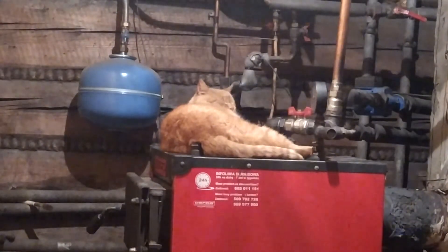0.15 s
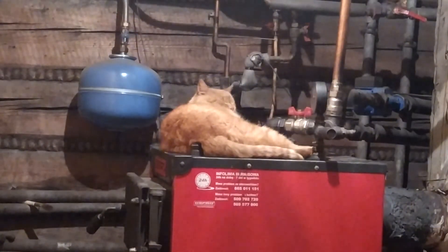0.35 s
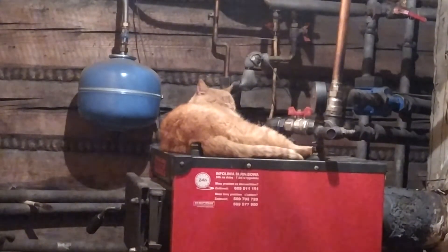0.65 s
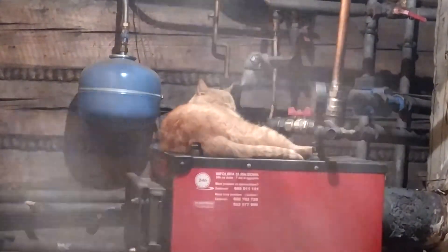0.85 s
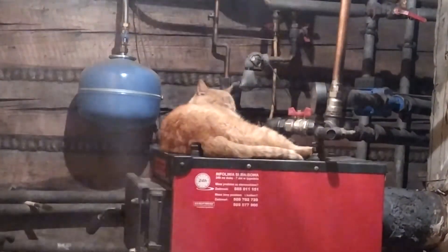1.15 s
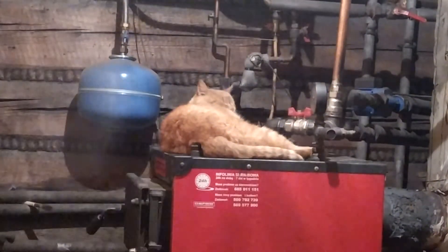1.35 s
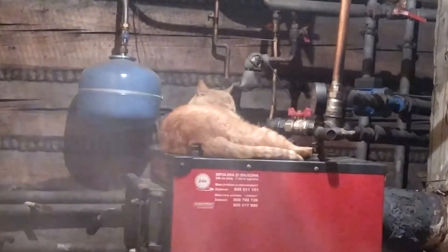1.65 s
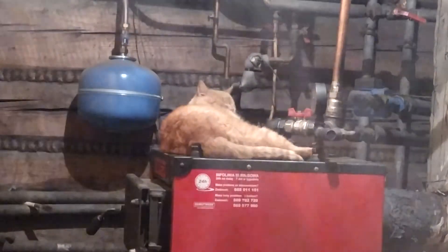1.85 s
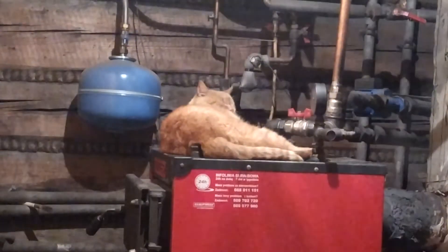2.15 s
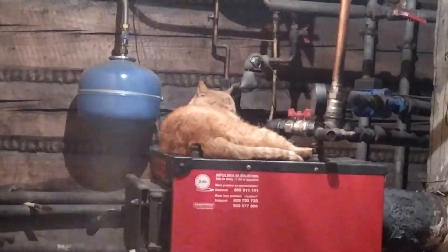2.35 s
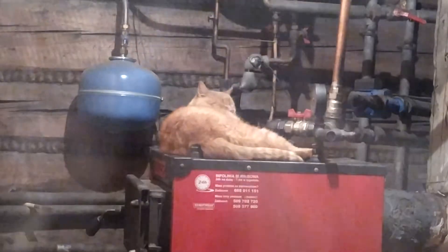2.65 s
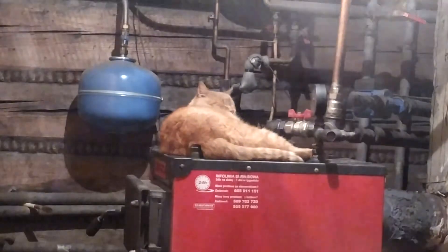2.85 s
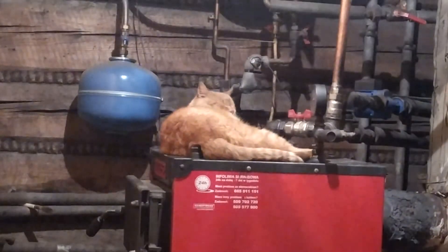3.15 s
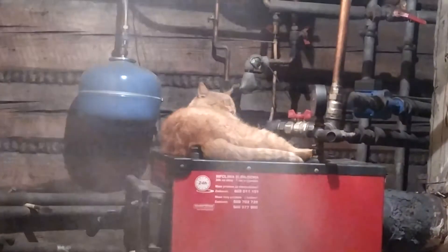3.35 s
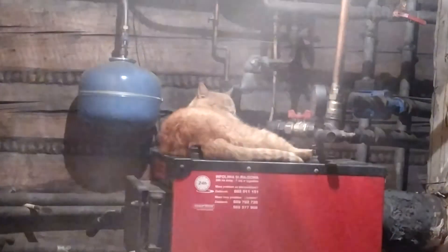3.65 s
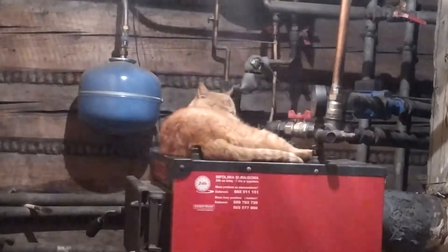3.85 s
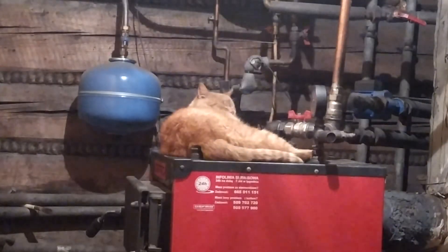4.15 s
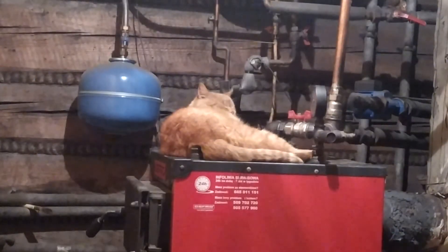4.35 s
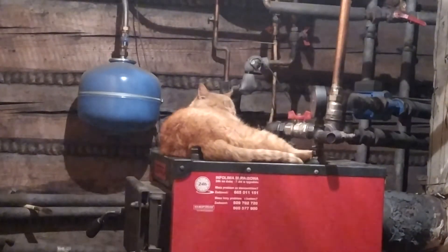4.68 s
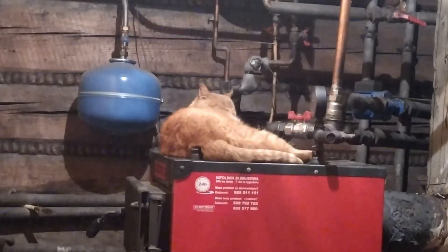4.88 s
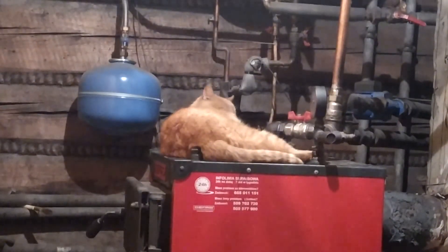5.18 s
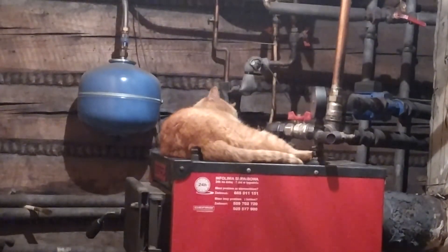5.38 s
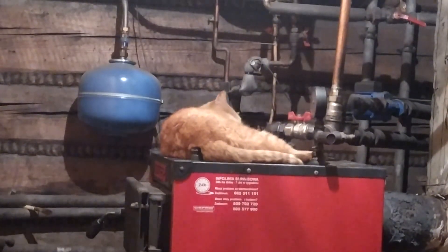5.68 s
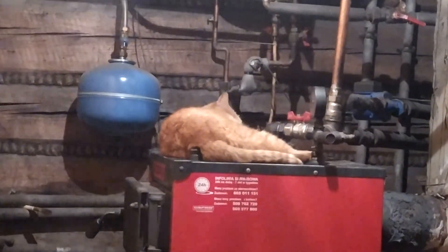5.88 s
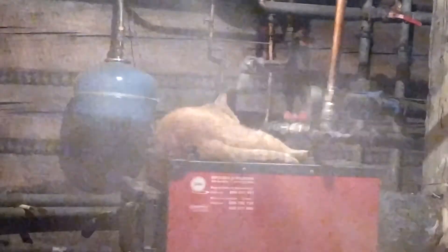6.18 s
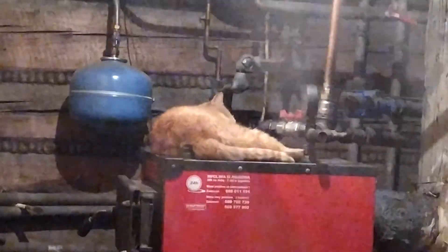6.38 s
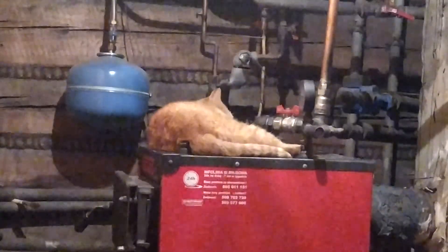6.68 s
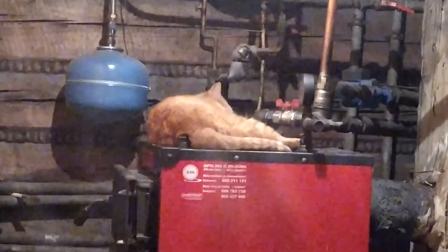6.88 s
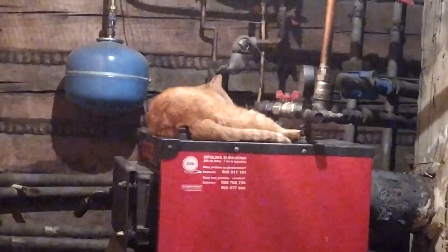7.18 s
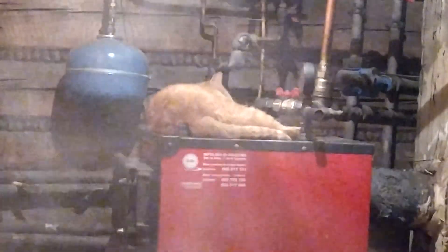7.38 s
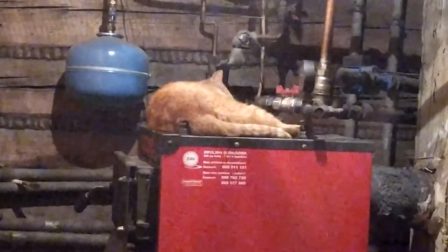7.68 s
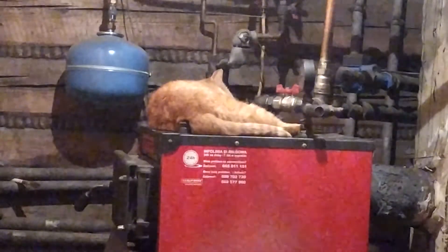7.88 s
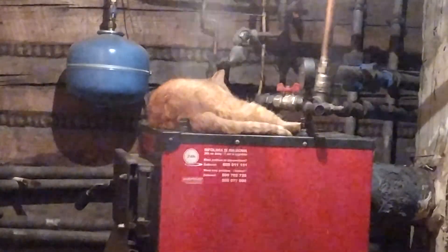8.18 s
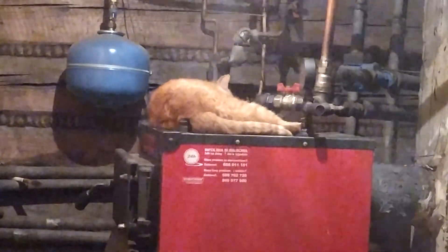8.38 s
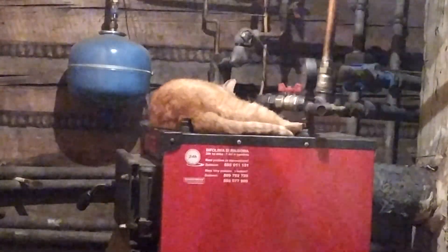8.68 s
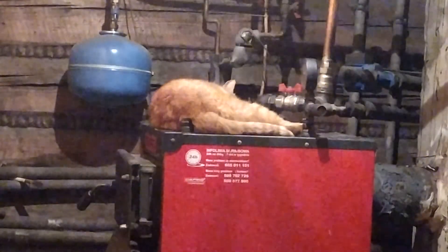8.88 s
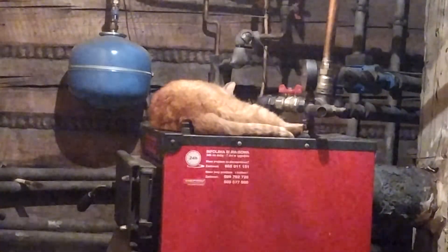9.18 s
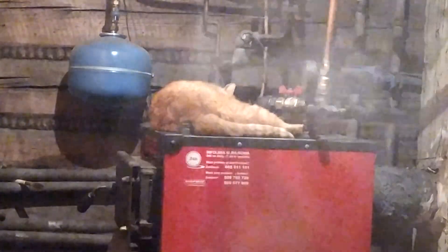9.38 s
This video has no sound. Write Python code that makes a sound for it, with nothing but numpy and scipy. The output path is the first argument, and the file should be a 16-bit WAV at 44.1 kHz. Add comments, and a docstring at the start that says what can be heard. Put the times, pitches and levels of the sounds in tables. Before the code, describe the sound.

Close up and a little to the right, popcorn cooks in a covered pan. A bright hiss of frying oil runs throughout, dotted with small kernels ticking on metal. Kernels crack open singly or in quick clusters, thumping the pan and knocking against its lid, sparsely at first and then more busily. A small room adds a short echo and a faint rumble underneath.

```python
"""Popcorn bursts in a lidded pan of hot oil, close to the right of a pair of microphones.
Each burst cracks the hull, thumps the pan's air and base, and sends puffed corn tumbling.
Oil sizzles and spits throughout, and small kernels tick on the metal.
A small hard room echoes the blows over a faint rumble."""
import sys
import numpy as np
from scipy import signal
from scipy.fft import rfft, irfft, next_fast_len
from scipy.io import wavfile
from scipy.ndimage import uniform_filter1d

SR = 44100
rng = np.random.default_rng(int(sys.argv[2]) if len(sys.argv) > 2 else 0)


def transcribe(signal):
    """Save signal, clipped to [-1, 1], as a 16-bit WAV file at the path in sys.argv[1]."""
    frames = np.atleast_2d(signal).T
    limited = np.clip(frames, -1, 1)
    pcm = np.round(limited * 32767).astype(np.int16)
    wavfile.write(sys.argv[1], SR, pcm)


N = 420273
LEFT_LAG_SAMPLES, LEFT_DB = 15, -0.5  # the pan is later and quieter on the left


def amp(db):
    """Turn decibels into a gain."""
    return 10 ** (np.asarray(db) / 20)


def level(x, db):
    """Set the average (RMS) level of x."""
    return x * amp(db) / np.sqrt(np.mean(x ** 2))


def band(x, lo_hz, hi_hz):
    """Keep what lies between two pitches."""
    edges_hz = [lo_hz, min(hi_hz, .45 * SR)]
    return signal.sosfilt(signal.butter(2, edges_hz, "band", fs=SR, output="sos"), x)


def fade(fade_s, length_s=.05):
    """Die away by 60 dB in fade_s seconds."""
    return np.exp(-np.log(1000) * np.arange(int(length_s * SR)) / SR / fade_s)


def sines(hz, fade_s, length_s):
    """One fading tone per row."""
    t = np.arange(int(length_s * SR)) / SR
    return np.sin(2 * np.pi * hz[:, None] * t) * np.exp(-np.log(1000) * t / fade_s[:, None])


def ring(blows, tones):
    """Each row of blows sets one fading tone ringing."""
    out = 0
    for row, (hz, db, fade_s) in zip(blows, tones):
        decay = np.exp(-np.log(1000) / (fade_s * SR))
        turn = 2 * np.pi * hz / SR
        feedback = [1, -2 * decay * np.cos(turn), decay * decay]
        out = out + amp(db) * signal.lfilter([0, decay * np.sin(turn)], feedback, row)
    return out


def strike(clicks, tones):
    """Each click lands somewhere new, so it rings its own mix of tones on three paths."""
    at = np.flatnonzero(clicks)
    blows = np.zeros((len(tones), 3, N))
    blows[..., at] = clicks[at] * rng.uniform(-1.126, 1, (len(at), 3, len(tones))).T
    return ring(blows, tones)


def coloured(x, curve):
    """Turn each pitch up or down along a curve."""
    hz, db = np.transpose(curve)
    size = next_fast_len(N)
    bins_hz = np.maximum(np.arange(size // 2 + 1) * SR / size, 1)
    gain = amp(np.interp(np.log(bins_hz), np.log(hz), db))
    return irfft(rfft(x, size) * gain, size)[..., :N]


def wander(per_s):
    """Glide from one random value to the next."""
    step = int(SR / per_s)
    held = np.repeat(rng.standard_normal(N // step + 1), step)
    return 0.62 * uniform_filter1d(held, step)[:N]


def grains(per_s, spread_db):
    """Random clicks, most small and a few large."""
    size = np.minimum(rng.exponential(size=N), 3.5)
    return (rng.random(N) < per_s / SR) * amp(spread_db * size)


def add(out, start_s, x):
    """Mix x into out at the given time."""
    i = int(start_s * SR)
    out[..., i:i + x.shape[-1]] += x[..., :N - i]


def pair(paths, share):
    """Three paths become stereo: row 0 reaches both sides, rows 1 and 2 one side each."""
    both = np.array([np.roll(paths[0], LEFT_LAG_SAMPLES), paths[0]])
    return np.sqrt(share) * both + np.sqrt(1 - share) * paths[1:]


# The tone of the room's rumble: pitch_hz, gain_db
RUMBLE_CURVE = [(18, -36), (30, 10), (59, -1.5), (76, -10.5), (160, -6.5), (217, -33), (296, -16),
                (333, -25), (735, -11.5), (929, -45), (1000, -12.5), (1300, -71), (2200, -120)]


def rumble():
    """Low room noise, mostly alike on both sides."""
    middle, side = (level(coloured(rng.standard_normal(N), RUMBLE_CURVE), -56.5) for _ in range(2))
    return middle + 0.26 * side * np.array([[1], [-1]])


def room(x, echo_db=-14):
    """Hard walls give each side its own scatter of echoes, thin in the bass."""
    echoes = rng.standard_normal((2, int(.15 * SR))) * fade(0.16, length_s=.15)
    echoes = band(echoes, lo_hz=320, hi_hz=4900)
    echoes *= amp(echo_db) / np.sqrt((echoes ** 2).sum(axis=1, keepdims=True))
    return x + signal.fftconvolve(x, echoes, axes=1)[:, :N]


def spits():
    """A gain that jumps whenever a lone large bubble bursts."""
    decay = fade(0.013)[1]
    bursts = signal.lfilter([1], [1, -decay], grains(per_s=55, spread_db=3.7))
    return 1.5 + level(bursts, -7.5)


# How loud the frying is as time passes: time_s, sizzle_db, tick_db, fizz_db
FRYING_LEVELS = [(0.0, -34.5, -44.5, -42.5), (0.4, -36, -47, -49), (0.7, -36.5, -44.5, -49),
                 (1.15, -38, -52, -53.5), (1.9, -39.5, -52, -52), (3.15, -40.5, -53, -53.5),
                 (3.2, -38.5, -66, -51), (3.4, -39.5, -50.5, -51), (4.601, -38.5, -52, -52),
                 (5.05, -40, -50, -49.5), (5.55, -38.5, -51, -47.5), (5.92, -34.5, -44, -40.5),
                 (6.26, -36.5, -45, -45.5), (7.248, -37, -43, -45.5), (8.15, -38.5, -43.5, -49),
                 (8.68, -39, -46, -51), (9.158, -35.5, -42, -46), (9.53, -38, -46.5, -49)]
# The tone of the sizzling oil: pitch_hz, gain_db
SIZZLE_CURVE = [(530, -56), (900, -12), (1040, -10.5), (1700, -2), (1970, -1), (2460, -2.5), (2760, -2),
                (3160, 4), (3600, 2), (3870, 1), (4400, 4.5), (5400, 4), (6300, 8), (7400, 7), (8600, 5.5),
                (11000, 10.5), (14300, -3), (22000, -120)]
# Tones a hard kernel rings in the metal: pitch_hz, level_db, fade_s
TICK_TONES = [(1310, -4, 0.037), (1510, 2, 0.025), (1687, 4, 0.048), (1793, 3, 0.033), (2130, 1.5, 0.025),
              (2306, -1.5, 0.077), (2441, 2.5, 0.057), (3110, 1.5, 0.042), (3380, 2, 0.026),
              (4450, 5.5, 0.0061), (6270, 5.5, 0.014)]


def frying():
    """Steam bubbles burst in flurries, each size at its own pace; loose kernels tick on the metal."""
    time_s, *columns = np.transpose(FRYING_LEVELS)
    sizzle_db, tick_db, fizz_db = (np.interp(np.arange(N) / SR, time_s, c) for c in columns)
    bursts = signal.fftconvolve(grains(per_s=300, spread_db=3.5), fade(0.05, length_s=0.02))[:N]
    flurry = (level(bursts, 0) + 3) * amp(1.4 * wander(25))
    edges_hz = 850 * 2 ** np.arange(0, 4, .5)  # one band for each bubble size
    oil = 0
    for lo_hz, hi_hz in zip(edges_hz, edges_hz[1:]):
        bubbles = band(rng.standard_normal((3, N)), lo_hz, hi_hz) * spits()
        flicker = 3.6 * wander(60) + 1.4 * wander(14)
        oil = oil + bubbles * amp(flicker * (2500 / lo_hz) ** 0.59)  # finer bubbles hiss more steadily
    sizzle = level(coloured(oil * flurry, SIZZLE_CURVE), sizzle_db)
    hiss = band(rng.standard_normal((3, N)), lo_hz=9500, hi_hz=15500)
    fizz = level(hiss * flurry * spits() * amp(1.7 * wander(40)), fizz_db)
    ticks = level(strike(grains(per_s=130, spread_db=3.1), TICK_TONES), tick_db)
    return pair(sizzle + fizz, share=0.019) + pair(ticks, share=0.44)


# Tones of the pan's walls and lid: pitch_hz, level_db, fade_s
WALL_TONES = [(366, 6.5, 0.013), (474, -0.5, 0.048), (549, -3.5, 0.08), (603, 0, 0.075), (690, -1.5, 0.06),
              (732, -1, 0.071), (800, -1.5, 0.067), (1014, 1, 0.05), (1045, 4, 0.033), (1146, 1, 0.046),
              (1406, 9, 0.026)]
# Puffed corn dropping onto the pan: start_s, level_db, pitch_hz
BOUNCES = [(0.116, -47, 724), (0.367, -47.5, 597), (0.675, -44, 536), (1.409, -53, 707), (1.601, -45, 721),
           (1.625, -36.5, 534), (1.636, -39, 544), (2.246, -37, 476), (2.295, -41.5, 745),
           (2.484, -46, 694), (2.535, -54, 616), (2.916, -40, 1190), (3.297, -42, 460), (3.428, -45, 1120),
           (3.502, -29, 440), (4.169, -46, 1200), (4.44, -49, 730), (4.896, -49, 730), (5.589, -39, 696),
           (5.64, -44, 950), (5.707, -47, 960), (5.87, -48, 741.5), (7.123, -37, 750), (7.137, -43, 749),
           (7.167, -46, 540), (7.229, -33, 1060), (7.427, -47, 744), (7.812, -40, 603), (8.057, -45, 740),
           (8.86, -41.5, 1140), (9.328, -45, 450)]


def bounces(reach_octaves=0.54):
    """A soft landing rings only the wall tones near its own pitch: a hollow knock."""
    out = np.zeros((3, N))
    hz, tone_db, fade_s = np.transpose(WALL_TONES)
    tones = sines(hz, fade_s, length_s=.12)
    for start_s, level_db, pitch_hz in BOUNCES:
        nearness = np.exp(-(np.log2(hz / pitch_hz) / reach_octaves) ** 2)
        mix = amp(level_db + tone_db) * nearness * rng.choice([-1, 1], (3, len(hz)))
        add(out, start_s, mix @ tones)
    return pair(out, share=0.79)


def crack(peak_db, hz, rise_s, fade_s, width, hiss_db, rattle=0.13, split=0):
    """Noise around one pitch plus a wide hiss; split sharpens the start, rattle adds a tail."""
    noise = rng.standard_normal((2, 3, int(.05 * SR)))
    pitched = level(band(noise[0], hz / width, hz * width), 0)
    hiss = level(band(noise[1], 970, 11200), hiss_db)
    fall = fade(fade_s) + split * fade(0.012) + rattle * fade(0.32)
    burst = (pitched + hiss) * fall * (1 - fade(rise_s))
    return burst * amp(peak_db) / np.abs(burst).max(axis=1, keepdims=True)


# Corn and hulls hitting the metal: start_s, crack_db, pitch_hz, knock_db
TAPS = [(0.013, -23.5, 1490, -50), (0.2448, -35, 4410, -70), (0.3158, -27, 1810, -58),
        (0.3295, -31, 1800, -63), (0.434, -29.5, 3400, -64), (0.5492, -19.5, 8500, -42),
        (1.063, -27, 2170, -53), (1.1318, -25.5, 6130, -65), (1.1836, -24.5, 2350, -59),
        (1.1977, -33, 2460, -62), (1.3364, -31, 2620, -71), (1.4086, -27.5, 3140, -60),
        (1.4585, -25, 2440, -64), (1.5621, -25, 6200, -36.5), (1.6224, -27, 6200, -39.5),
        (1.932, -26, 1580, -52), (2.124, -29, 3190, -77), (2.4274, -34, 6260, -36.5),
        (2.469, -41, 6534, -45), (2.8861, -27, 2220, -59), (2.908, -33, 1920, -54), (3.062, -32, 4440, -69),
        (3.191, -17, 6540, -60), (3.228, -19, 6400, -60), (3.2624, -30, 2550, -35), (3.502, -34, 7400, -49),
        (3.5175, -47, 6000, -38), (3.593, -42, 6040, -45), (3.6351, -34, 3120, -66),
        (3.897, -27, 5000, -73), (4.047, -34, 2520, -58), (4.4325, -33, 3310, -66),
        (4.52, -29, 2510, -39.5), (4.5861, -29, 8300, -47.5), (4.7147, -33, 2460, -58),
        (5.1064, -31, 4900, -62), (5.193, -32, 4270, -69), (5.2112, -23.5, 2380, -51),
        (5.253, -31, 2420, -64), (6.109, -24, 9800, -39.5), (6.2115, -29.5, 1560, -53),
        (6.4515, -19.5, 8000, -61), (6.7386, -24, 1640, -46), (6.795, -23, 1540, -64),
        (6.9007, -38, 4430, -60), (7.1128, -27, 1810, -36.5), (7.226, -28, 11500, -58),
        (7.2307, -29, 3350, -39), (7.3051, -18.5, 2450, -31.5), (7.4335, -28, 2470, -63),
        (7.4944, -33, 2520, -71), (7.5316, -29, 2450, -62), (7.586, -18.5, 2290, -68),
        (7.706, -26, 2350, -45), (7.7651, -26, 2242, -55), (7.874, -26, 1690, -60),
        (7.9336, -18, 1449, -38), (8.0457, -25, 2270, -54), (8.091, -21, 1495, -46),
        (8.1344, -29, 2420, -55), (8.177, -14, 2180, -28), (8.2202, -26, 7220, -39),
        (8.253, -30, 1770, -60), (8.4143, -31, 5008, -35.5), (8.425, -20.5, 2450, -42),
        (8.4774, -29, 2300, -58), (8.5774, -29, 2370, -59), (9.0666, -27, 5010, -46),
        (9.0952, -28, 2972, -63), (9.427, -28.5, 3580, -63)]


def taps():
    """Each hit on the metal makes a short, narrow crack."""
    out = np.zeros((3, N))
    for start_s, db, hz, _ in TAPS:
        tap = crack(db, hz, rise_s=0.0045, fade_s=0.043, width=1.138, hiss_db=-4.5, split=0.55)
        add(out, start_s, tap)
    return pair(out, share=0.12)


# High tones of the lid: pitch_hz, level_db, fade_s
LID_TONES = [(3090, -2, 0.016), (3360, -2, .014), (3700, -3, .01), (4020, -2, 0.016), (4700, -5, 0.011),
             (5040, -2, 0.018), (6440, -11, 0.008)]
# Hard kernels flung at the lid: start_s, ring_db, knock_db, fade_ratio, edge_db_per_octave
SNAPS = [(2.2133, -6.5, -34, .55, -9), (9.1453, -14, -36, 1.0, 6)]


def snaps(middle_hz=4060, click_db=-9, side_gain=.45):
    """A kernel clicks on the lid and briefly rings its high tones; each side hears its own mix."""
    out = np.zeros((3, N))
    hz, tone_db, fade_s = np.transpose(LID_TONES)
    octaves_from_middle = np.abs(np.log2(hz / middle_hz))
    for start_s, ring_db, _, fade_ratio, edge_db_per_octave in SNAPS:
        gains = amp(ring_db + tone_db + edge_db_per_octave * octaves_from_middle)
        lean = rng.choice([-1, 1], len(hz))  # which side each tone favours
        paths = np.array([(-1.) ** np.arange(len(hz)), lean, -lean])
        ping = (gains * paths) @ sines(hz, fade_ratio * fade_s, length_s=.04)
        add(out, start_s, ping * (1 - fade(0.00046, length_s=.04)))
        click = crack(ring_db + click_db, hz=9100, rise_s=0.001, fade_s=0.02,
                      width=1.01, hiss_db=20, rattle=0.082)
        add(out, start_s, click)
    return out[0] + side_gain * out[1:]


def knocks(tumble_db=-15, tumble_fade_s=0.69):
    """Pops, taps and snaps ring the walls and lid; after a pop the corn tumbles on."""
    blows, stir = np.zeros((2, N))
    for start_s, _, _, knock_db, *_ in POPS + TAPS:
        blows[int(start_s * SR)] += amp(knock_db)
    for start_s, _, knock_db, *_ in SNAPS:
        blows[int(start_s * SR)] += amp(knock_db)
    for start_s, _, _, knock_db, *_ in POPS:
        add(stir, start_s, amp(knock_db + tumble_db) * fade(tumble_fade_s, length_s=.35))
    tumbling = stir * grains(per_s=80, spread_db=4.2)
    walls = strike(blows + tumbling, WALL_TONES)
    return pair(uniform_filter1d(walls, size=9), share=0.7)  # smoothing dulls the treble


# Low tones of the pan's air and base: pitch_hz, level_db, fade_s
BASE_TONES = [(88, -17, 0.12), (128, 3, 0.1), (116.2, -6.5, 0.82), (118.6, -11.5, 0.74), (251, -9, 0.048),
              (292, -13, 0.068)]


def thumps(push_s=0.0017, lead_s=0.0013, place_db=1.7, lid_db=-2.5, tap_db=-8.5, left_db=-0.5):
    """A soft push just before each crack rings air, base and lid; where it lands varies the mix."""
    tones = BASE_TONES + [(155, 0, 0.21)]  # plus the lid's low tone
    blows = np.zeros((len(tones), N))
    push = np.hanning(int(push_s * SR))
    rings_long = np.array(BASE_TONES)[:, 2] > .25
    hits = [(start_s, thump_db, long_ring_db) for start_s, *_, thump_db, long_ring_db in POPS]
    hits += [(start_s, knock_db + tap_db, 0) for start_s, *_, knock_db in TAPS]
    for start_s, thump_db, long_ring_db in hits:
        base_db = thump_db + long_ring_db * rings_long + place_db * rng.standard_normal(len(BASE_TONES))
        gains = amp(np.append(base_db, thump_db + lid_db))
        add(blows, start_s - lead_s, gains[:, None] * push / push.sum())
    boom = ring(blows, tones)
    return np.array([amp(left_db) * np.roll(boom, LEFT_LAG_SAMPLES), boom])


# Bursting kernels: start_s, crack_db, pitch_hz, knock_db, thump_db, long_ring_db
POPS = [(0.592, -23.5, 9200, -39, -33.5, 0.5), (0.7822, -12.5, 8750, -32, -29, -13),
        (1.4194, -19, 2400, -41, -34.5, -4), (1.516, -8.5, 8940, -35, -28.5, -5),
        (2.1944, -17.5, 3330, -33, -29.5, -3), (2.3863, -18, 6500, -31.5, -28.5, -1),
        (3.1877, -12.5, 10500, -36.5, -28.5, -2), (3.214, -19.5, 10500, -44, -28, -2),
        (3.4669, -21, 2140, -32.5, -28.5, -4), (4.475, -26, 3220, -35, -39, -8),
        (5.577, -18, 1620, -30, -32, -3), (5.9213, -13.5, 8900, -34, -30.5, -7),
        (5.9465, -11.5, 7300, -42, -33, -2), (5.975, -25, 8200, -60, -53, -8),
        (6.0118, -21, 1730, -41.5, -36.5, 3), (6.4708, -21, 1580, -31.5, -34, -10),
        (6.655, -22, 1470, -48, -41.5, -4), (6.669, -18, 8700, -45, -34.5, -3),
        (7.088, -21, 2300, -33.5, -31, -10), (7.214, -9.5, 9550, -31, -28, -13),
        (7.2927, -14.5, 9600, -44, -31.5, -4.5), (7.6259, -23, 1888, -46, -36, -3),
        (7.8022, -21, 2250, -30.5, -35, -1), (7.9565, -14, 2280, -31, -32, -1),
        (8.163, -16.5, 8600, -40, -31, -6), (8.3645, -16, 1530, -34, -33, 2),
        (8.7032, -19.5, 1630, -42.5, -35, -8), (9.121, -7.5, 8400, -38.5, -35, -3),
        (9.2383, -16, 2200, -35.5, -37.5, -6)]


def pops():
    """A hull splits with a sharp crack and a wide hiss of escaping steam."""
    out = np.zeros((3, N))
    for start_s, db, hz, *_ in POPS:
        pop = crack(db, hz, rise_s=0.0041, fade_s=0.043, width=1.122, hiss_db=1.5, rattle=0.29, split=1.7)
        add(out, start_s, pop)
    return pair(out, share=0.12)


def scene():
    """The pan sits a little to the right, over the room's rumble."""
    pan = room(thumps() + knocks() + bounces() + pops() + taps()) + snaps() + frying()
    return amp([[LEFT_DB / 2], [-LEFT_DB / 2]]) * pan + rumble()


def record(dry, low_hz=59, top_hz=15850):
    """The microphones lose the deep bass and the recorder cuts the highest treble."""
    thin = signal.sosfilt(signal.butter(4, low_hz, "high", fs=SR, output="sos"), dry)
    return signal.sosfilt(signal.ellip(10, .2, 70, top_hz, fs=SR, output="sos"), thin)


dry = scene()
out = record(dry)
transcribe(out)
```